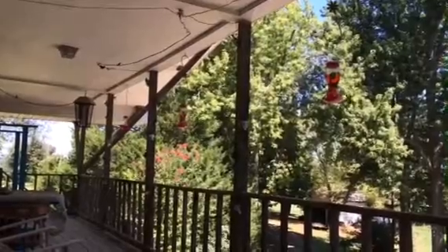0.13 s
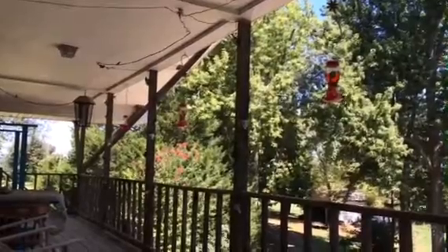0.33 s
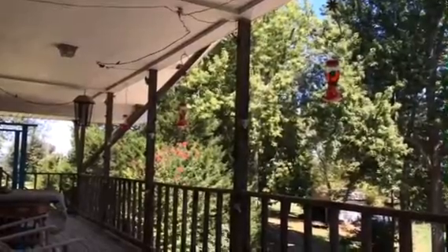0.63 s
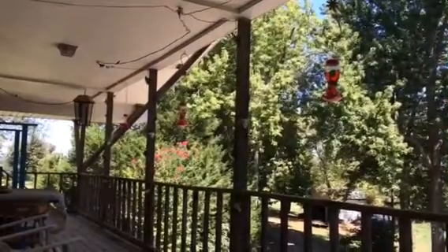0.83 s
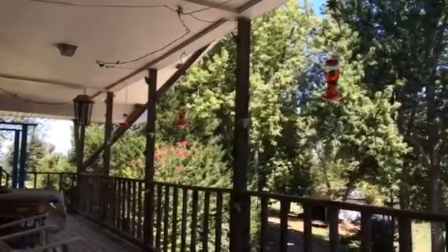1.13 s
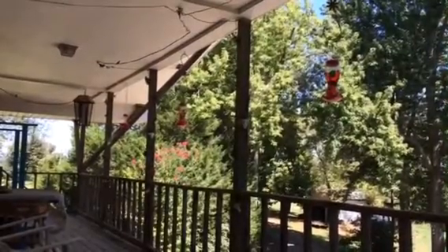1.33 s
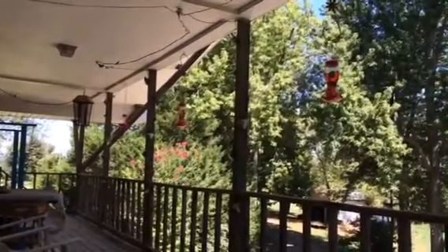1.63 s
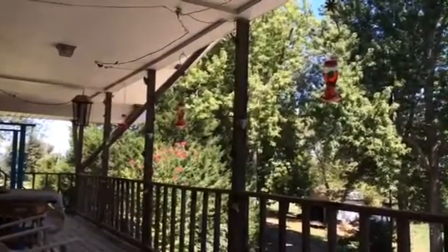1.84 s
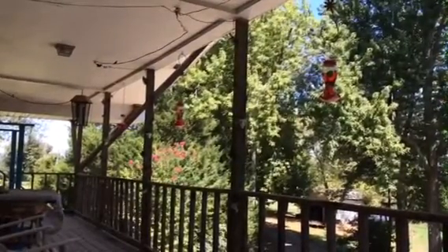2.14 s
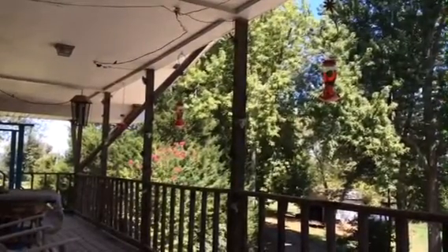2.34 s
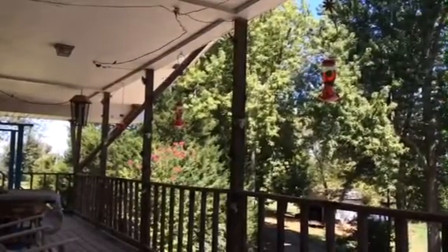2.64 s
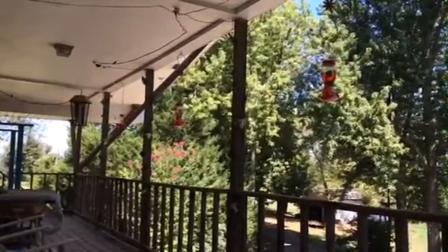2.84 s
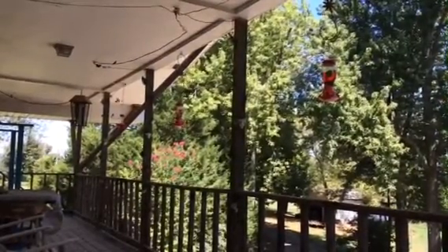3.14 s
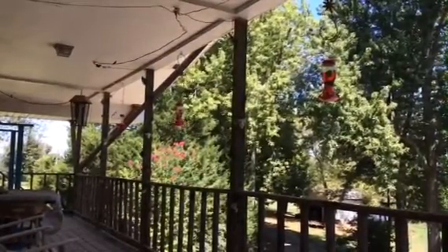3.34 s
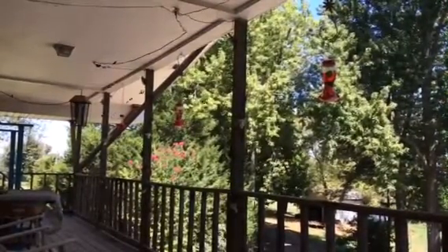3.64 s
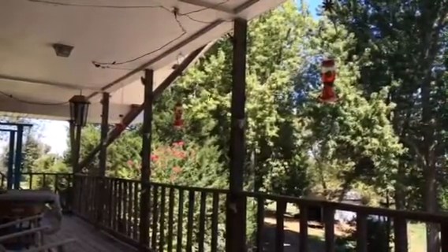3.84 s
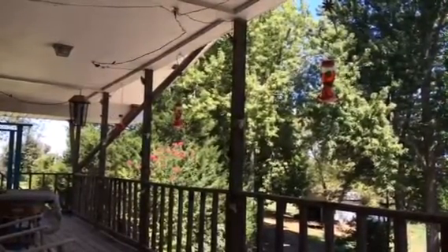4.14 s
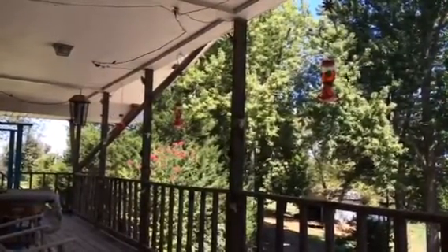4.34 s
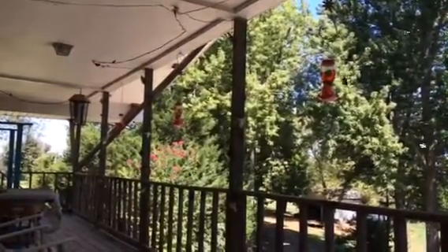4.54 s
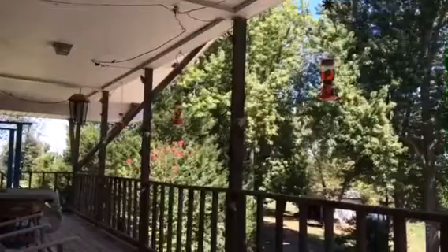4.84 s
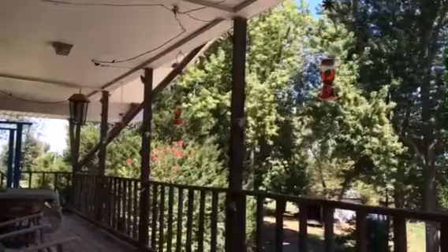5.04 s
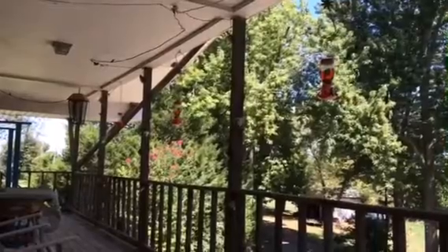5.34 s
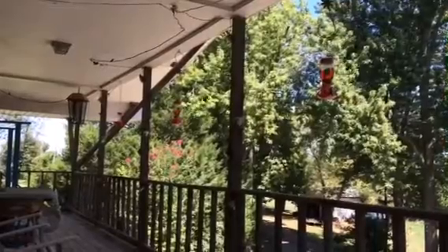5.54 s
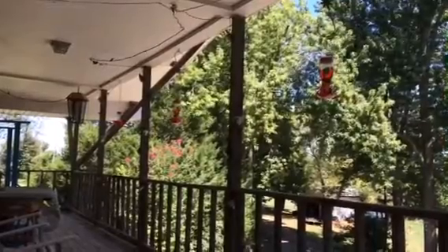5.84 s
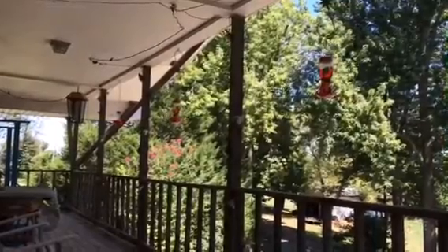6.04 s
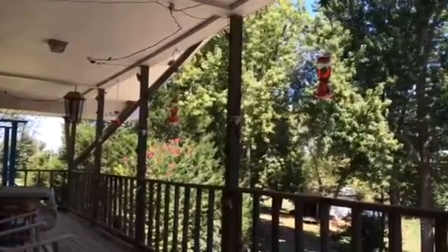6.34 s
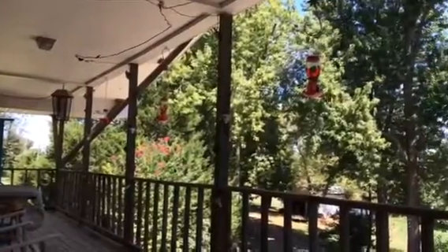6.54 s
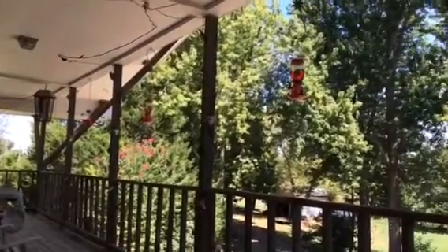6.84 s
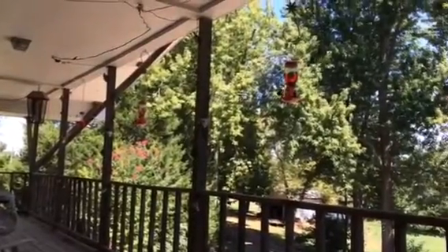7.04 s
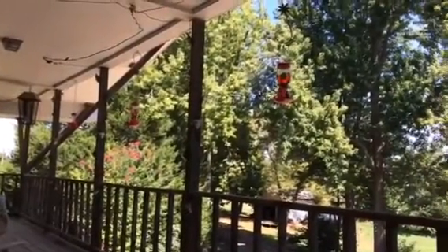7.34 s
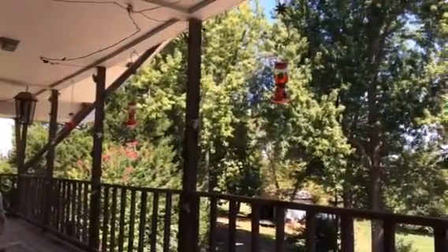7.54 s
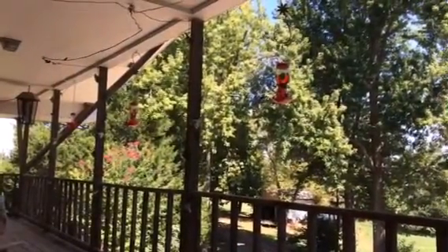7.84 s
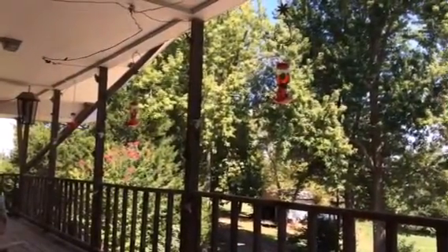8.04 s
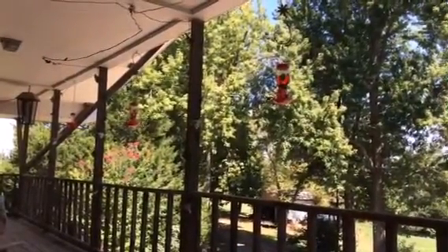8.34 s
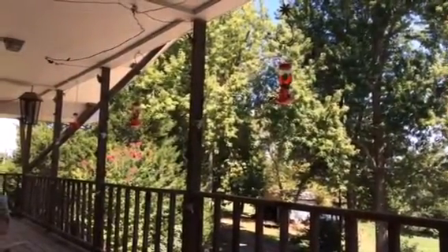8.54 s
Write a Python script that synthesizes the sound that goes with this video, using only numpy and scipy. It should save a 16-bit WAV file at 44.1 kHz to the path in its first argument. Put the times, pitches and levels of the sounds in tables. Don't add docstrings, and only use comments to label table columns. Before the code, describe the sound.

A porch with sugar feeders, heard from a few metres away on a phone. Low, fluttering wing hum swells and fades throughout over a far rumble, breezy leaf hiss and fine insect sizzle. At 0-0.4 s come soft high whistles, distant chips, a lower whistle and a hoarse trill. Bright whistles follow at 0.5 and 1.2, the loudest at 1.65, with tiny ticks between. Falling chips start near 1.8 and run quickly from 2.4 to 3.0; fainter whistles, a short trill and level chatter fill 3.2-4.4. At 4.75 a loud rising whistle leads to a deep fluttering trill, a rasp, and close chips until 5.5. From 6 to 7 only faint far calls remain over stronger wing hum. At 7.2 a low whistle and hoarse trill return, then rasps to 7.7, four firm chips around 7.9 and a faint whistle before 8.7. Calls have short woody echoes and a duller tree tail.

```python
import sys
import numpy as np
from scipy import signal
from scipy.fft import rfft, irfft, next_fast_len
from scipy.io import wavfile
from scipy.ndimage import uniform_filter1d, minimum_filter1d

SR = 44100
rng = np.random.default_rng(int(sys.argv[2]) if len(sys.argv) > 2 else 0)


def log_audio(samples):
    frames = np.atleast_2d(samples).T
    limited = np.clip(frames, -1, 1)
    pcm = np.round(limited * 32767).astype(np.int16)
    wavfile.write(sys.argv[1], SR, pcm)


def field_ratio(decibels):
    return 10 ** (np.asarray(decibels, dtype=float) / 20)


N = 383229


def walk(rate_hz):
    levels = np.repeat(rng.standard_normal(int(N / SR * rate_hz) + 2), 4)
    levels = uniform_filter1d(levels, size=4)
    return 1.25 * np.interp(np.arange(N) * 4 * rate_hz / SR, np.arange(len(levels)), levels)


def unit(x):
    return x / np.sqrt(np.mean(x ** 2))


def colour(hz, points):
    points_hz, points_db = np.transpose(points)
    return field_ratio(np.interp(np.log(np.maximum(hz, 1)), np.log(points_hz), points_db))


def add(out, start_s, x):
    i = max(int(start_s * SR), 0)
    out[i:i + len(x)] += x[:N - i]


def swell(u, rise, fall):
    opening = np.sin(np.pi / 2 * np.clip(u / rise, 0, 1)) ** 2
    closing = np.sin(np.pi / 2 * np.clip((1 - u) / fall, 0, 1)) ** 2
    return opening * closing


# (time [s], length [s], peak level [dB], first pitch [Hz], last pitch [Hz])
NEAR_WHISTLES = [
    [(.002, 0.041, -46, 6900, 6610), (.045, 0.028, -43, 6550, 6850), (.081, 0.048, -49, 6940, 7070)],
    [(.497, 0.055, -39, 6930, 6740), (.548, 0.017, -39, 6850, 6840), (.567, 0.037, -45, 6880, 6900)],
    [(1.174, 0.02, -46.5, 7500, 7500), (1.192, .012, -40, 7000, 7060), (1.204, 0.0186, -35.5, 6930, 6800),
     (1.223, 0.027, -40, 6840, 6630), (1.251, 0.046, -48.5, 6690, 6830)],
    [(1.642, 0.0262, -47.5, 7140, 6860), (1.669, 0.017, -32, 7160, 7130), (1.693, 0.043, -33, 7200, 7190)],
    [(3.232, 0.072, -47.5, 7140, 6860), (3.297, 0.039, -47, 6830, 6740)],
    [(4.982, 0.039, -50, 5670, 5820), (5.022, 0.047, -51, 5810, 5630)],
    [(4.733, 0.0157, -48.5, 6100, 6330), (4.749, 0.0258, -35, 6410, 6230), (4.774, 0.03, -40.5, 6260, 6530),
     (4.802, 0.038, -41, 6520, 6560)],
]
LOW_WHISTLES = [
    [(.178, 0.03, -42, 5320, 5320), (.21, 0.027, -39, 5350, 5520), (.236, 0.042, -50.5, 5540, 5530)],
    [(7.213, 0.0122, -43, 5600, 5750), (7.225, 0.0169, -42, 5610, 5330), (7.242, 0.041, -44, 5500, 6030)],
]
FAINT_WHISTLES = [
    [(.72, 0.035, -60, 5750, 6140), (.765, 0.054, -52, 6200, 6320)],
    [(1.51, 0.041, -55.5, 6610, 6080), (1.55, 0.1, -54.5, 6260, 6910)],
    [(2.18, .07, -68, 5670, 5600)],
    [(2.335, 0.099, -54.5, 6950, 7090)],
    [(2.335, .085, -62, 6070, 6040)],
    [(2.915, .16, -65, 6160, 6170)],
    [(3.74, 0.15, -60.5, 6730, 6740)],
    [(4.24, 0.098, -60.5, 6460, 6670)],
    [(6.7, 0.096, -57, 7210, 7200)],
    [(8.185, 0.12, -55.5, 7100, 7350)],
]
# (pitch [Hz], level [dB])
OCTAVE = [(5400, 5), (5800, -1.5), (6400, -4), (6850, -13), (7200, -16)]


def whistles(calls, blur, fade, scoop=0):
    attack_s, catch_s, scoop_s = 0.0097, 0.0057, 0.00796
    out, flutter, second, waver = np.zeros(N), walk(90), walk(70), walk(250)
    for call in calls:
        hz, gain = [], []
        for k, (_, length_s, db, first_hz, last_hz) in enumerate(call):
            u = np.linspace(0, 1, int(length_s * SR))
            rise = (catch_s if k else attack_s) / length_s
            fall = fade if k == len(call) - 1 else catch_s / length_s
            hz.append(first_hz + (last_hz - first_hz) * u)
            gain.append(field_ratio(db) * swell(u, rise, fall))
        hz, gain = np.concatenate(hz), np.concatenate(gain)
        start_s = call[0][0]
        t = np.arange(len(hz)) / SR
        i = ((start_s + t) * SR).astype(int)
        bend = 1 + scoop * np.exp(-t / scoop_s) + blur * waver[i]
        phase = 2 * np.pi * np.cumsum(hz * bend) / SR
        octave = colour(hz, OCTAVE) * field_ratio(0.93 * second[i]) * np.cos(2 * phase)
        add(out, start_s, 1.4 * gain * (np.cos(phase) + octave) * field_ratio(1.3 * flutter[i]))
    return out


# (frequency [Hz], level [dB])
THROAT = [(1500, -5), (3000, -2.5), (4200, -6.5), (5500, -3.5), (7500, 6), (9500, -2), (12000, -6),
          (15500, -19)]


def syrinx(hz, overtones_db, tilt_db):
    phase = 2 * np.pi * np.cumsum(hz) / SR
    k = np.arange(2, 9)[:, None]
    gain = colour(k * hz, THROAT) * (k * hz < .45 * SR) * field_ratio(tilt_db * (k - 2.5))
    upper = gain * np.cos(k * phase)
    return colour(hz, THROAT) * np.cos(phase) + field_ratio(overtones_db) * upper.sum(axis=0)


# (time [s], length [s], peak level [dB], crest pitch [Hz], last dip pitch [Hz])
NEAR_TRILLS = [
    (3.381, 0.078, -48.5, 6660, 3940),
    (4.05, .072, -48, 6200, 1917),
    (4.899, 0.096, -36.5, 6430, 1804),
]
HOARSE_TRILLS = [
    (.313, .095, -42, 5240, 1413),
    (7.273, .085, -42, 5780, 1780),
    (7.697, .082, -42, 5140, 1915),
]


def trills(table, plunges_hz, first_dip, deepen, rough, narrow):
    out, waver, uneven = np.zeros(N), walk(1200), walk(120)
    for start_s, length_s, db, crest_hz, last_hz in table:
        t = np.arange(0, length_s, 1 / SR)
        u, i = t / length_s, (t * SR + start_s * SR).astype(int)
        depth = -np.log(first_dip) + u ** deepen * np.log(first_dip * crest_hz / last_hz)
        swing = np.pi * plunges_hz * t - .7 + 4 * rough * uneven[i]
        plunge = np.abs(np.sin(swing)) ** narrow
        hz = crest_hz * np.exp(-depth * plunge + rough * waver[i])
        voice = syrinx(hz, 0.85 + 1.3 * plunge, tilt_db=-1.0)
        level_db = db - 4.1 * plunge * (1.5 - 0.66 * u) - 12.3 * u ** 2
        add(out, start_s, field_ratio(level_db) * swell(u, 0.18, 0.18) * voice)
    return out


# (time [s], peak level [dB], pitch [Hz])
FALLING_CHIPS = [
    (1.847, -50, 2360),
    (1.9072, -52, 2186),
    (2.436, -49, 2240),
    (2.4924, -51.5, 2275),
    (2.5491, -49, 2097),
    (2.608, -50.5, 2190),
    (2.6743, -50.5, 2200),
    (2.7383, -53, 2080),
    (2.823, -55, 2086),
    (4.2115, -55, 2480),
]
NEAR_CHIPS = [
    (1.787, -55, 2510),
    (5.202, -45.5, 2253),
    (5.273, -45, 2137),
    (5.348, -46, 2110),
]
HELD_CHIPS = [
    (7.8574, -50, 3040),
    (7.9194, -46.5, 3026),
    (7.9694, -50.5, 2970),
    (8.0344, -50, 2915),
]
LAST_CHIPS = [
    (2.9287, -54.5, 1990),
    (3.0145, -60, 2310),
    (4.1087, -54, 1974),
    (5.4127, -62, 2300),
    (5.45, -50, 1907),
    (5.4982, -51.5, 1940),
]
FAR_CHIPS = [(.0662, -53, 2007), (.1256, -58, 1590), (.1494, -58, 1960), (.1894, -61, 2030),
             (.5994, -63.5, 1990), (.6544, -58, 1985), (.7921, -59.5, 2256), (1.1608, -52, 2200),
             (1.1807, -54, 1960), (1.254, -68, 2200), (1.3189, -63, 2100), (1.3957, -63, 2120),
             (2.0617, -58.5, 2110), (2.1944, -64, 1820), (3.5219, -58.5, 1674), (4.1789, -61, 1840),
             (4.3655, -60, 1676), (5.9828, -60.5, 2000), (6.0626, -55.5, 2040), (6.0894, -74, 1780),
             (6.1639, -62, 2200), (6.1818, -61.5, 1714), (6.2781, -60.5, 2060), (6.3984, -63, 1680),
             (6.4921, -60, 1980), (6.5244, -60.5, 1940), (6.5994, -58, 1826), (6.7394, -60, 1915),
             (6.8239, -65, 2160), (7.0559, -60.5, 1906)]
LEVEL_CHIPS = [(1.5633, -63, 1650), (1.605, -60, 1770), (1.6394, -66, 1695), (3.6731, -58, 2590),
               (3.7192, -58, 2445), (3.7738, -57, 2420), (3.8287, -55, 2540), (3.8917, -54.5, 2400),
               (3.9603, -56, 2550), (4.2857, -62, 2330), (8.444, -55, 1664), (8.4694, -63, 1740)]
# (time [s], peak level [dB], pitch [Hz], length [s])
RASPS = [
    (5.084, -49.5, 2590, 0.058),
    (7.438, -47, 2866, 0.039),
    (7.528, -47.5, 2940, .055),
    (7.625, -47.5, 2976, 0.04),
]
FLAT_RASPS = [
    (2.355, -54.5, 2494, .043),
    (3.605, -57.5, 2890, .053),
]


def chips(table, fall, hold, lead, rough, overtones_db, effort=0, rise=0.19, fade=.31, shake=0, usual_s=.025):
    usual_db, shake_hz = -52, 320
    out, waver, beat = np.zeros(N), walk(900), walk(300)
    for start_s, db, hz, *length_s in table:
        t = np.arange(0, length_s[0] if length_s else usual_s, 1 / SR)
        u, i = t / t[-1], (t * SR + start_s * SR).astype(int)
        wobble = rough * (0.35 + u) * waver[i]
        wobble = wobble + shake * np.sin(2 * np.pi * shake_hz * t + 0.97 * beat[i])
        pitch_hz = hz * 2 ** (fall * (lead - u ** hold) + wobble)
        voice = syrinx(pitch_hz, overtones_db + effort * (db - usual_db), tilt_db=-1.2)
        add(out, start_s - .003, field_ratio(db + 2.16 * beat[i]) * swell(u, rise, fade) * voice)
    return out


# (time [s], peak level [dB],
# centre [Hz], T60 [s])
TICKS = [(.24, -51, 1200, 0.022), (0.259, -55, 1310, 0.085), (0.499, -52, 6000, .01),
         (.585, -47, 6050, 0.017), (.909, -47, 5000, 0.013), (.93, -60.5, 1520, 0.3),
         (1.655, -55, 9050, 0.61), (1.24, -52.5, 10000, 0.12), (.04, -60, 7000, 0.23),
         (3.195, -51, 8000, .01), (3.305, -48.5, 8000, .03), (3.526, -55, 7000, 0.045),
         (4.748, -58, 4000, .03), (4.825, -68, 6000, .02)]


def ticks():
    out = np.zeros(N)
    t = np.arange(int(.25 * SR)) / SR
    for start_s, db, hz, t60_s in TICKS:
        band = signal.butter(1, [hz / 1.8, min(hz * 1.6, .45 * SR)], "band", fs=SR)
        puff = unit(signal.lfilter(*band, rng.standard_normal(len(t))))
        add(out, start_s, field_ratio(db - 60 * t / t60_s) * puff)
    return out


def echo(near, middle, far):
    porch_t60_s, porch_db, trees_t60_s, trees_db = 0.11, -4.5, 0.38, -13
    t = np.arange(int(.5 * SR)) / SR
    porch = rng.standard_normal(len(t)) * field_ratio(-60 * t / porch_t60_s)
    trees = rng.standard_normal(len(t)) * field_ratio(-60 * t / trees_t60_s)
    porch = signal.lfilter([1], [1, -.4], porch)
    trees = signal.lfilter([1], [1, -.85], trees)
    tail = field_ratio(porch_db) * unit(porch) + field_ratio(trees_db) * unit(trees)
    tail = tail * (t > .002) / np.sqrt(len(t))
    wet = signal.oaconvolve(field_ratio(1.0) * near + field_ratio(2) * middle + field_ratio(4.5) * far, tail)[:N]
    return near + field_ratio(-1.5) * middle + field_ratio(-0.5) * far + wet


# (wing stroke [Hz], stroke level [dB], octave level [dB])
WINGS = [
    (97.4, -7, -3.5),
    (90.8, -5, 0.5),
    (104.5, 0.5, -5.5),
    (78.1, -25, -5),
]


def wings():
    out = 0
    for hz, stroke_db, octave_db in WINGS:
        rate_hz = hz * (1 + .03 * walk(3) + .035 * walk(25))
        phase = 2 * np.pi * np.cumsum(rate_hz) / SR
        beat = field_ratio(stroke_db) * np.cos(phase) + field_ratio(octave_db) * np.cos(2 * phase)
        beat = beat + field_ratio(-16) * np.cos(4 * phase)
        out = out + field_ratio(2.8 * walk(5) + 3.6 * walk(22)) * beat
    return unit(out)


def wash(points, lo_hz, hi_hz, flicker_db):
    size = next_fast_len(N)
    hz = np.arange(size // 2 + 1) * SR / size
    noise = rfft(rng.standard_normal(size)) * colour(hz, points)
    noise = noise / np.std(irfft(noise * (hz > lo_hz) * (hz < hi_hz), size))
    place = 2 * np.log2(np.maximum(hz, 1))
    first, last = np.floor(2 * np.log2(points[0][0])), 2 * np.log2(points[-1][0])
    out = 0
    for band in np.arange(first, last + 1):
        share = np.clip(1 - abs(place - band), 0, 1)
        out = out + field_ratio(flicker_db * walk(6)) * irfft(noise * share, size)[:N]
    return out


# (time [s], level [dB])
HOVER = [(0, -50), (.09, -44), (.56, -58), (.92, -52), (1.26, -60), (1.77, -54), (2.61, -60.5),
         (2.93, -51.5), (3.36, -52.5), (4.21, -55.5), (4.36, -52.5), (4.85, -57), (5.28, -53.5),
         (5.98, -49), (7.48, -51.5), (7.72, -54), (8.11, -57), (8.69, -54)]
# (time [s], level [dB])
BREEZE = [(0, 6), (.56, -0.5), (1.3, 0.5), (1.8, 1.5), (2.15, 1), (2.7, 2), (4.2, 0.5), (4.85, -0.5),
          (6.9, 0), (7.7, 1.5), (8.69, 1)]
# (frequency [Hz], density [dB per Hz])
RUMBLE = [(15, -39), (25, -10), (86, -3), (129, -4), (186, 0), (266, -10.5), (510, -17.5), (796, -26.5),
          (961, -24.5), (1290, -28.5), (1500, -31), (1950, -57), (3300, -120)]
# (frequency [Hz], density [dB per Hz])
HISS = [(710, -39), (1200, -11), (1350, -18), (1580, -4.5), (2800, -8), (3790, -4.5), (6810, -2), (7900, 3),
        (8330, 1.5), (8980, -10), (9670, -7), (14700, -4.5), (15300, -2)]


def garden():
    t = np.arange(N) / SR
    hover_db = np.interp(t, *np.transpose(HOVER))
    breeze_db = np.interp(t, *np.transpose(BREEZE))
    traffic_db_per_s = 0.41
    rumble_db = -65.5 + 0.3 * (hover_db - hover_db.mean()) + 0.45 * breeze_db
    rumble_db = rumble_db + traffic_db_per_s * (t - t.mean())
    rumble = field_ratio(rumble_db) * wash(RUMBLE, 244.4, 1200, flicker_db=2.5)
    hiss = field_ratio(-60 + breeze_db) * wash(HISS, 3200, 17900, flicker_db=0.96)
    return field_ratio(hover_db - 4) * wings() + rumble + hiss


def scene():
    near = whistles(NEAR_WHISTLES, blur=0.0046, fade=0.92)
    near = near + whistles(LOW_WHISTLES, blur=0.0043, fade=0.5, scoop=0.085) + ticks()
    near = near + trills(NEAR_TRILLS, plunges_hz=71.4, first_dip=.8, deepen=1.2, rough=0.029, narrow=6.0)
    near = near + chips(NEAR_CHIPS, fall=0.88, hold=1.2, lead=.4, rough=0.091, overtones_db=-2.5,
                        effort=-0.3, rise=0.44, fade=0.32, usual_s=.027)
    near = near + chips(HELD_CHIPS, fall=0.87, hold=3.46, lead=0.042, rough=0.035, overtones_db=-0.5,
                        effort=-0.63, rise=0.43, fade=0.54)

    middle = whistles(FAINT_WHISTLES, blur=0.0127, fade=0.46)
    middle = middle + trills(HOARSE_TRILLS, plunges_hz=104.8, first_dip=.62, deepen=1.8, rough=.07, narrow=5)
    middle = middle + chips(LAST_CHIPS, fall=0.604, hold=1.2, lead=.3, rough=.07, overtones_db=-10.5,
                            rise=0.26, fade=0.55)
    middle = middle + chips(FALLING_CHIPS, fall=0.728, hold=1.4, lead=.28, rough=0.076, overtones_db=-2,
                            effort=-.3, rise=0.33, fade=0.44)
    middle = middle + chips(RASPS, fall=1.3, hold=2.2, lead=.12, rough=0.128, overtones_db=7.5,
                            effort=-2.19, rise=0.21, fade=0.42, shake=0.247)
    middle = middle + chips(FLAT_RASPS, fall=0.316, hold=1.5, lead=0.126, rough=0.111, overtones_db=-7.5,
                            effort=-2.44, shake=0.26)

    far = chips(FAR_CHIPS, fall=0.59, hold=1.238, lead=0.252, rough=0.093, overtones_db=-8,
                effort=-0.14, usual_s=.0197)
    far = far + chips(LEVEL_CHIPS, fall=0.18, hold=2.4, lead=0.15, rough=0.13, overtones_db=-5.5,
                      fade=0.96, shake=0.064, usual_s=0.0363)
    return (echo(near, middle, far) + garden())[None]


def drop_masked(x, from_hz, under_db):
    hz, _, z = signal.stft(x, SR, nperseg=1024)
    size = uniform_filter1d(np.abs(z), size=7, axis=1)
    treble = size * (hz > from_hz)[:, None]
    masker = -minimum_filter1d(-treble, size=61, axis=1, origin=29)
    return signal.istft(z * (size > field_ratio(under_db) * masker), SR, nperseg=1024)[1][:, :N]


def band_limit(x):
    return signal.sosfilt(signal.butter(12, 15440, fs=SR, output="sos"), x)


def record(dry):
    cut = signal.sosfilt(signal.ellip(8, .2, 70, 15400, fs=SR, output="sos"), dry)
    cut = signal.sosfilt(signal.butter(2, 32, "high", fs=SR, output="sos"), cut)
    finished = drop_masked(cut, from_hz=8200, under_db=-22)
    return band_limit(finished)


dry = scene()
out = record(dry)
log_audio(out)
```